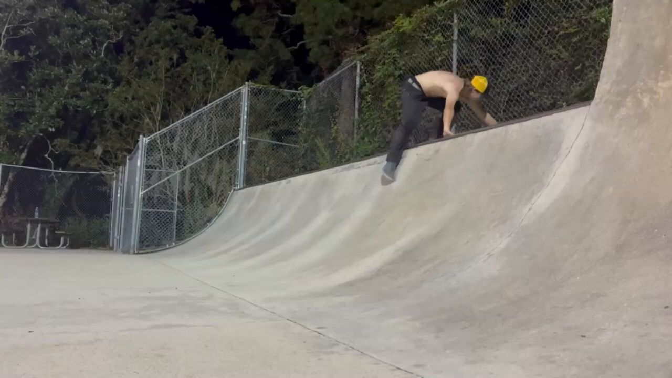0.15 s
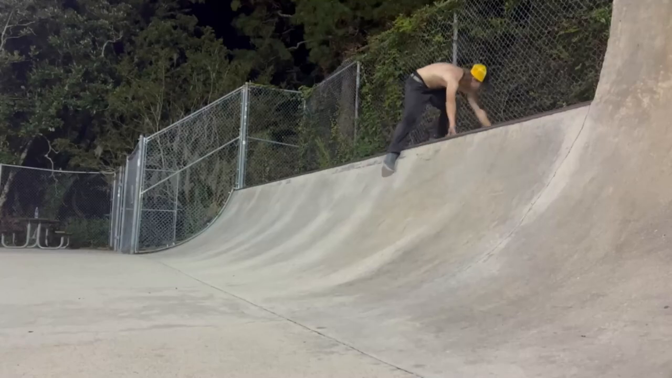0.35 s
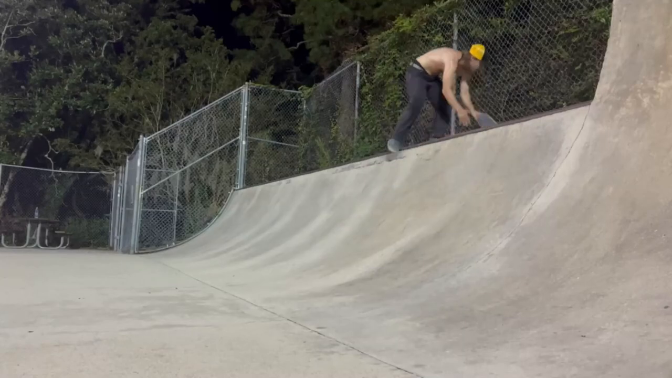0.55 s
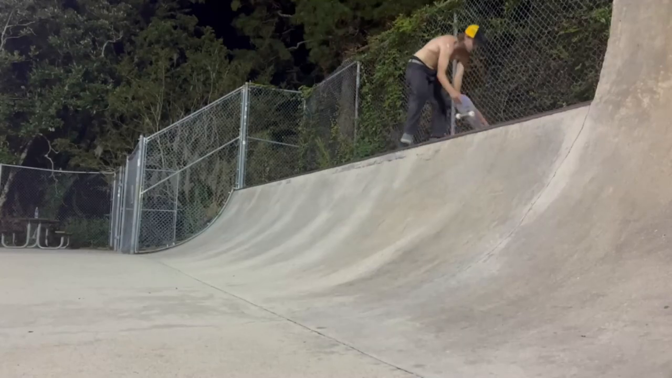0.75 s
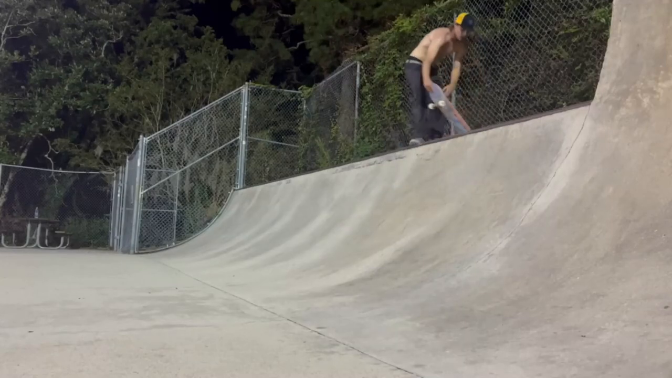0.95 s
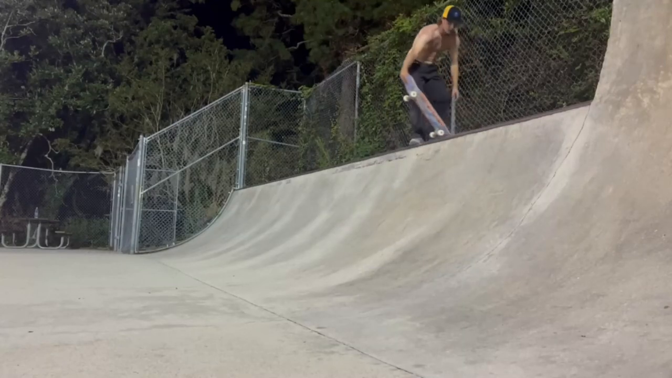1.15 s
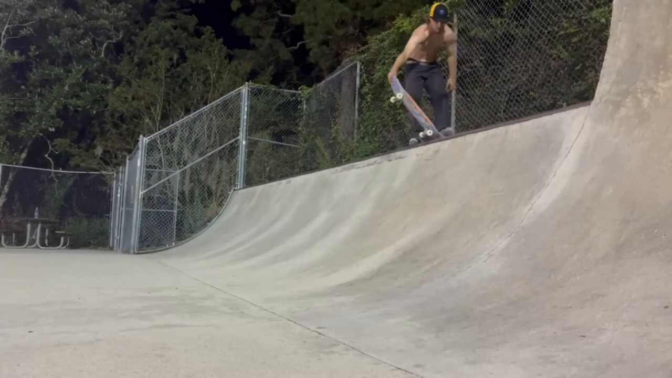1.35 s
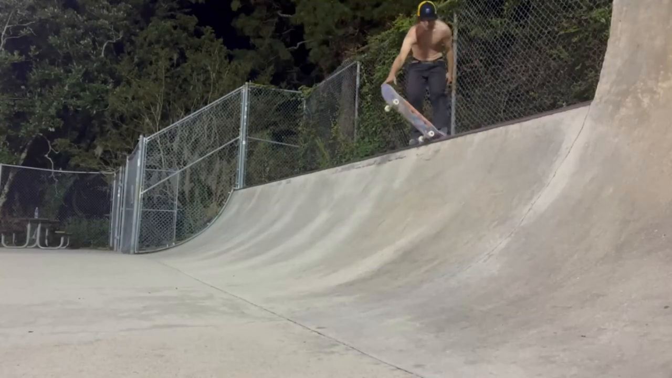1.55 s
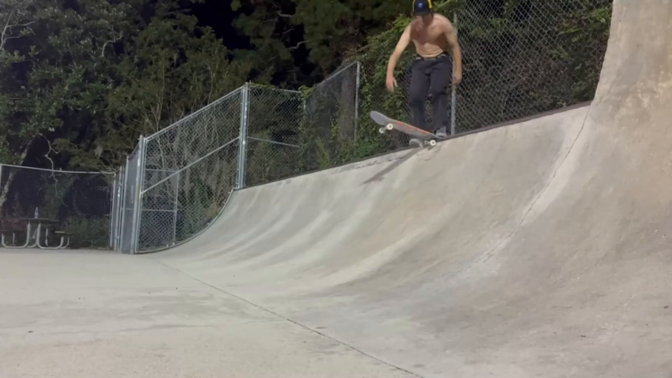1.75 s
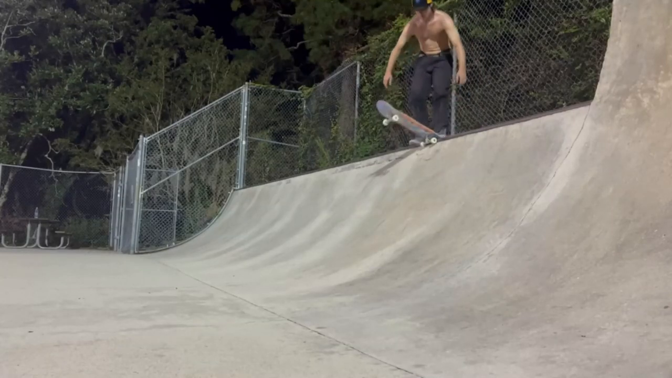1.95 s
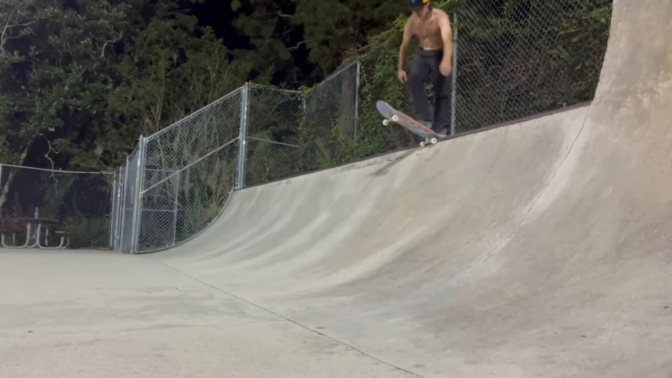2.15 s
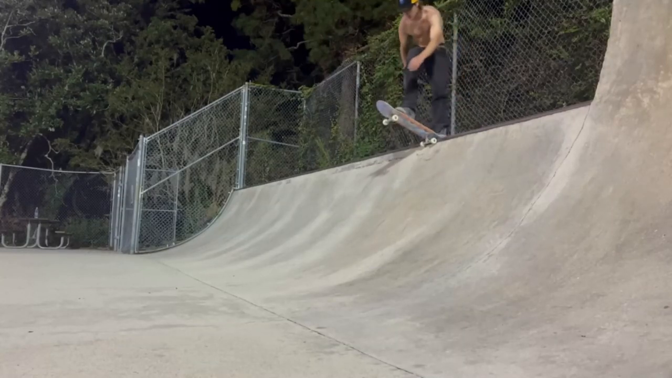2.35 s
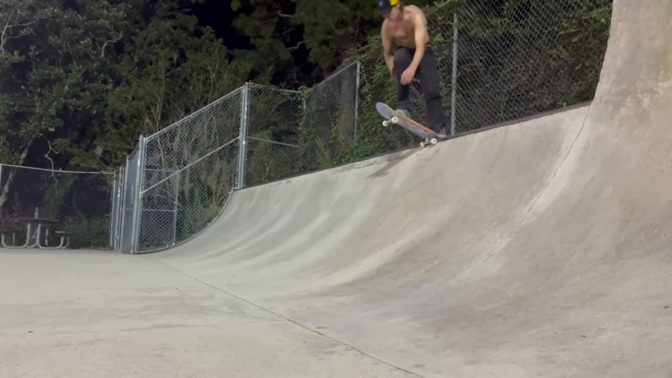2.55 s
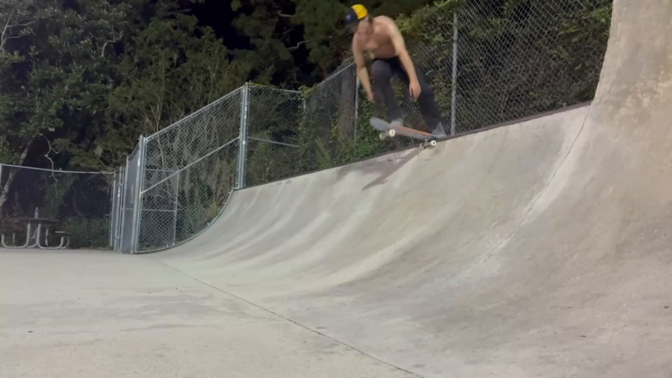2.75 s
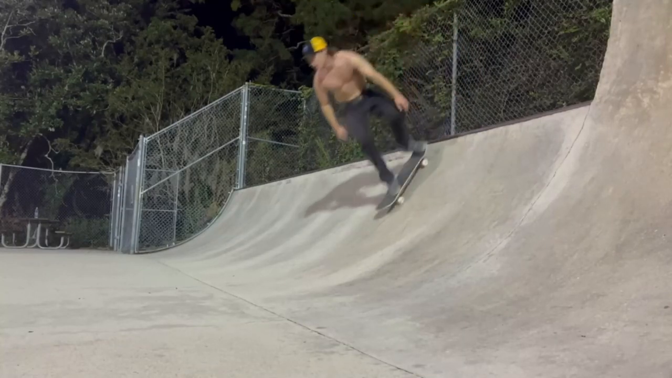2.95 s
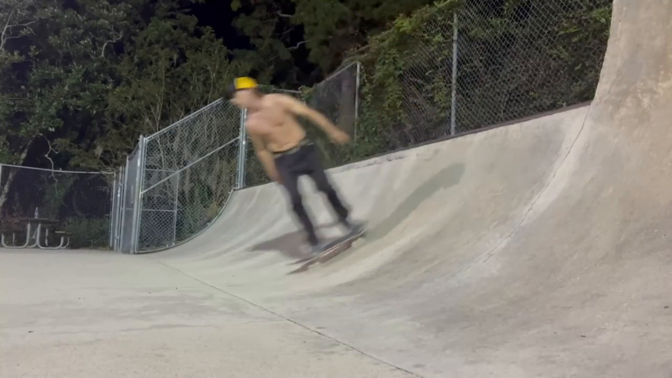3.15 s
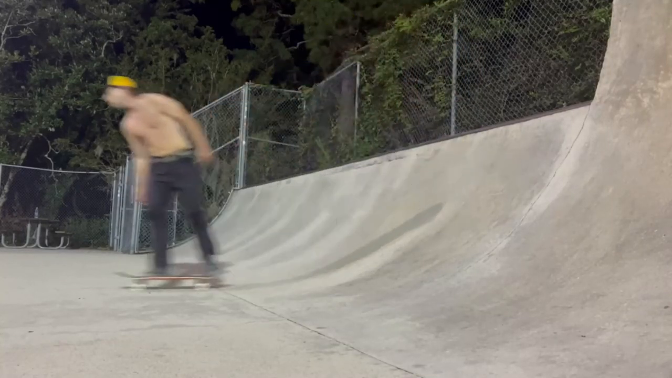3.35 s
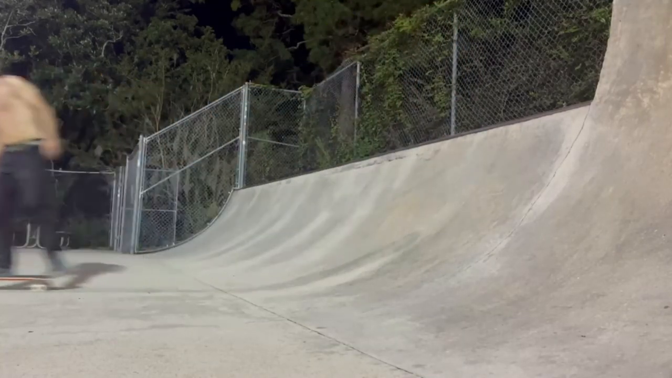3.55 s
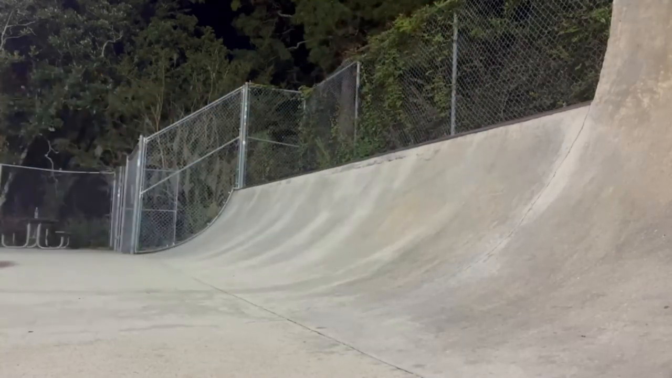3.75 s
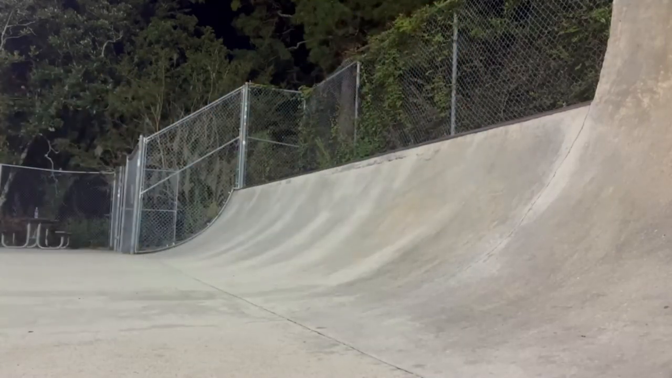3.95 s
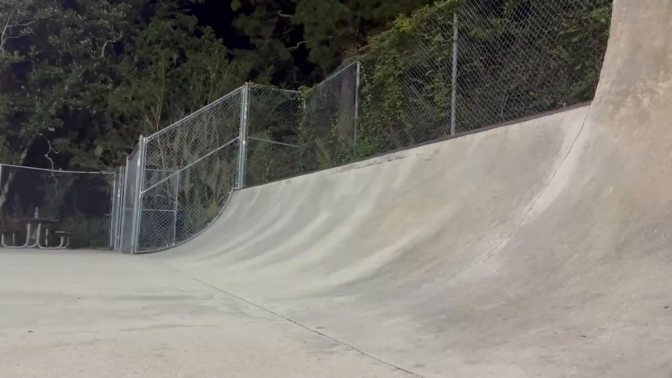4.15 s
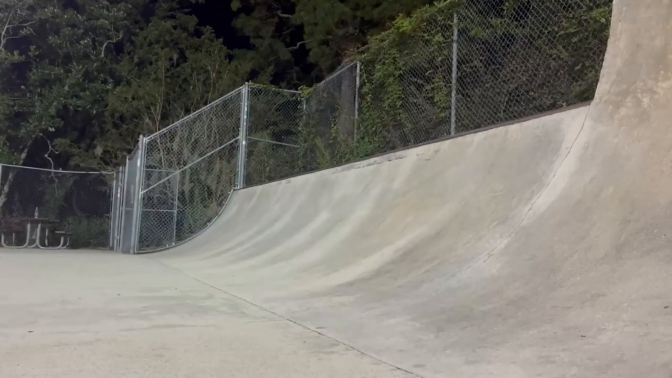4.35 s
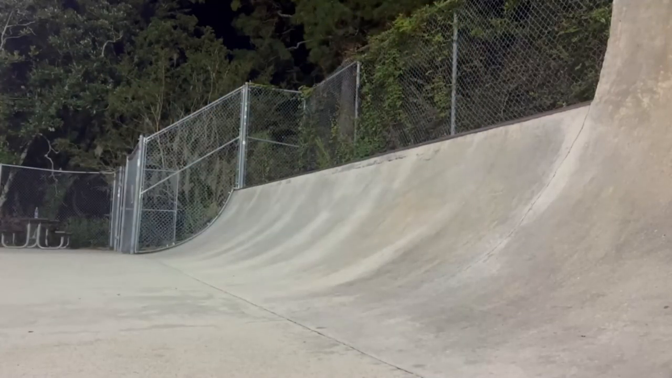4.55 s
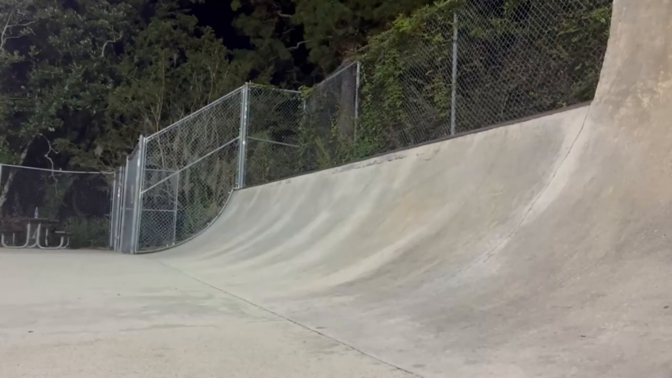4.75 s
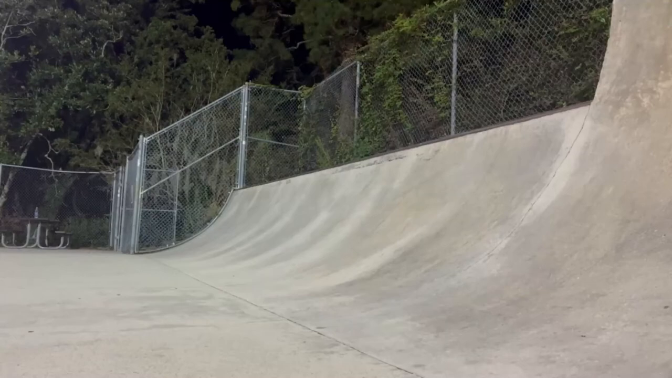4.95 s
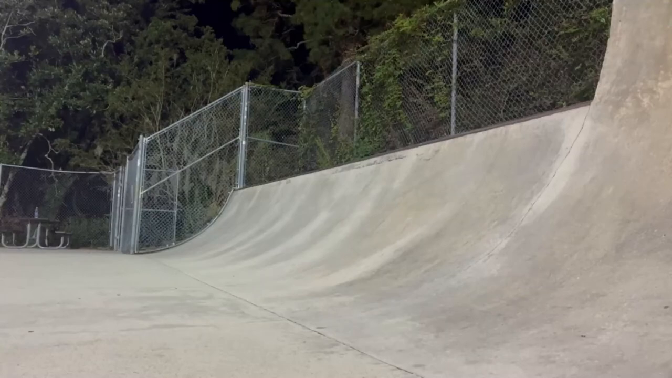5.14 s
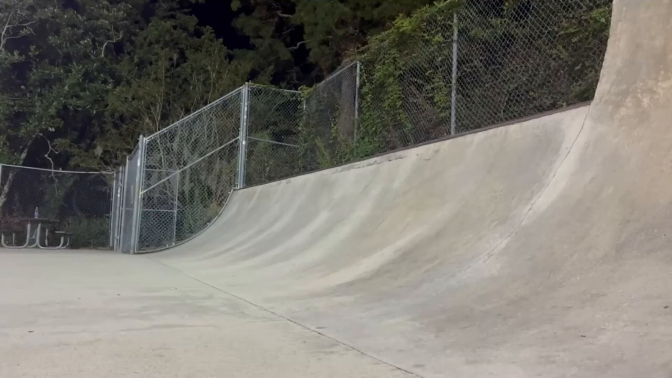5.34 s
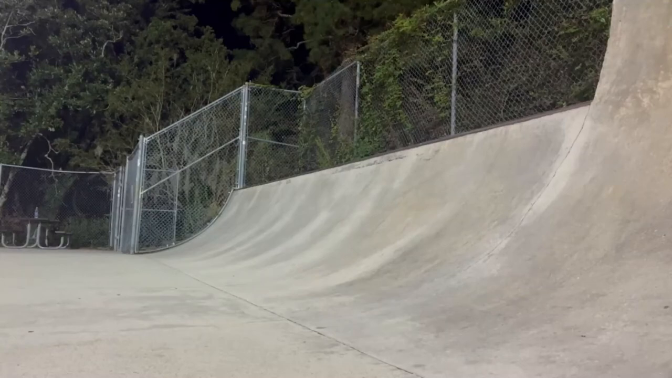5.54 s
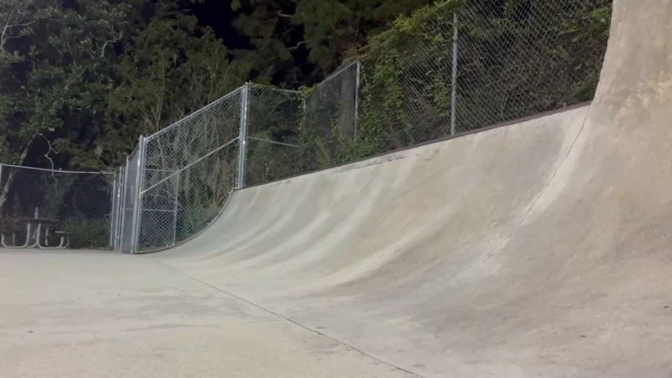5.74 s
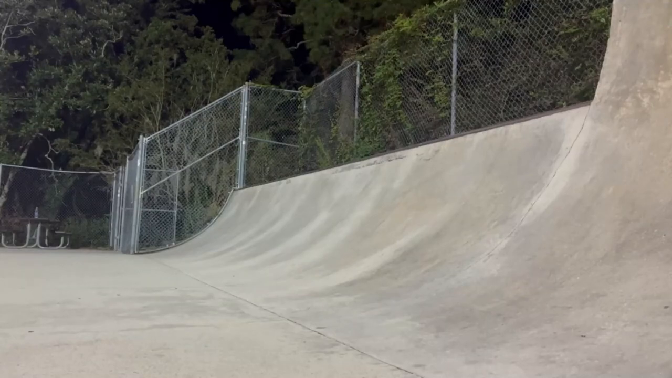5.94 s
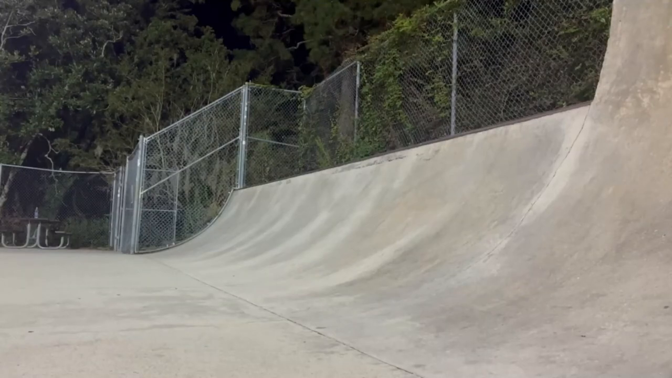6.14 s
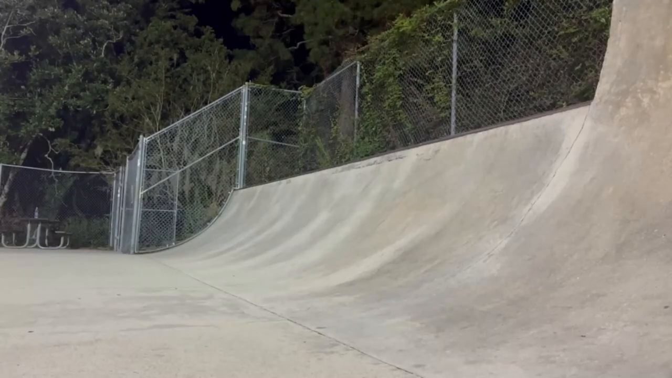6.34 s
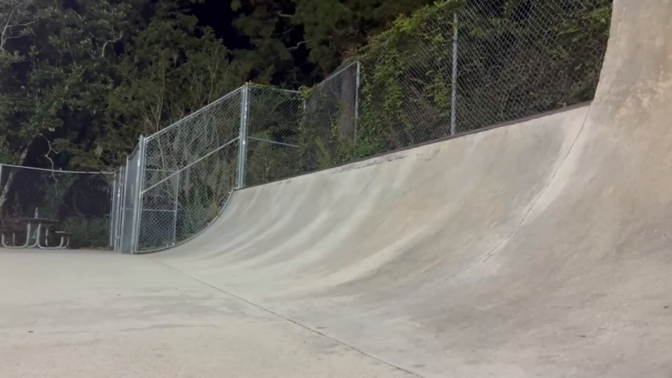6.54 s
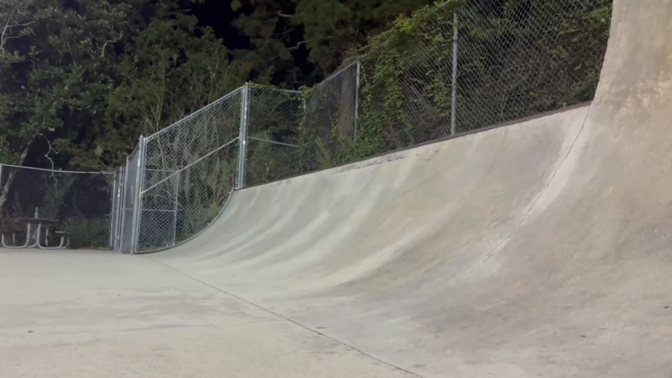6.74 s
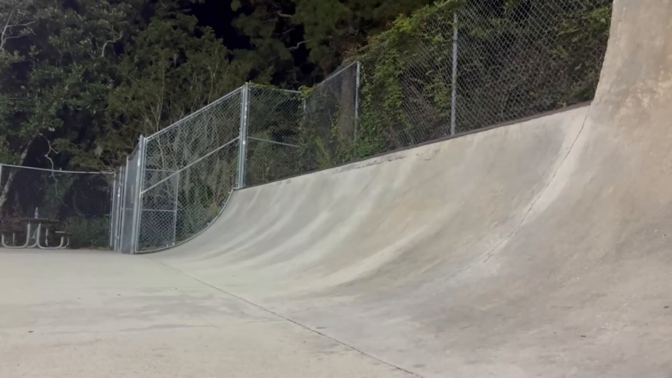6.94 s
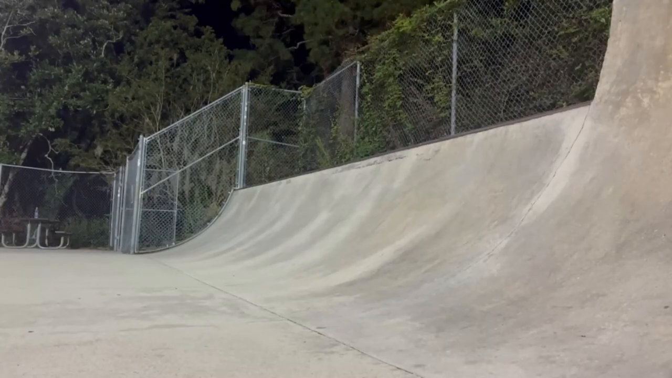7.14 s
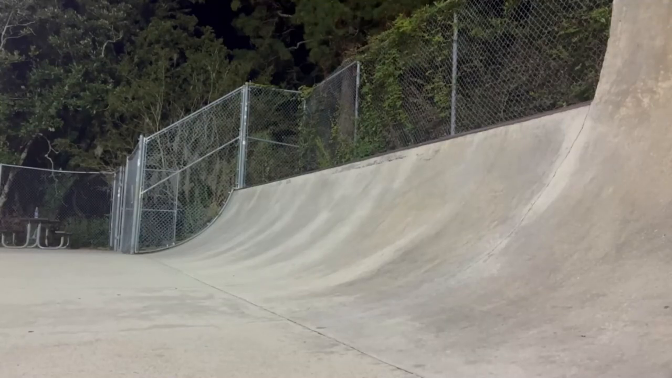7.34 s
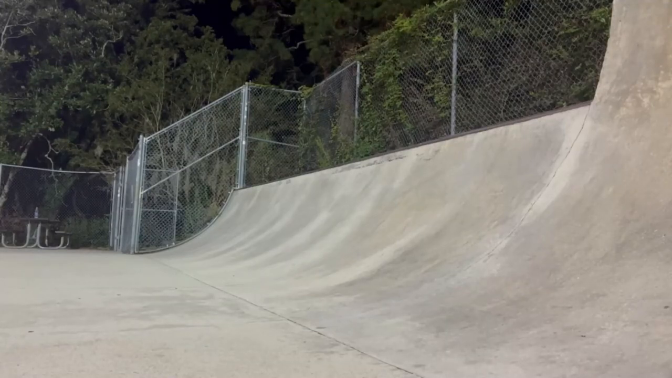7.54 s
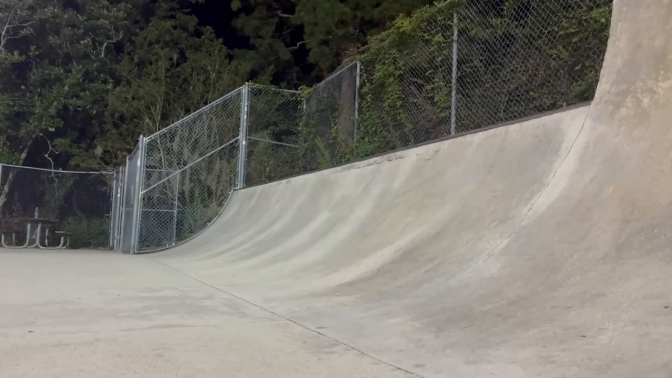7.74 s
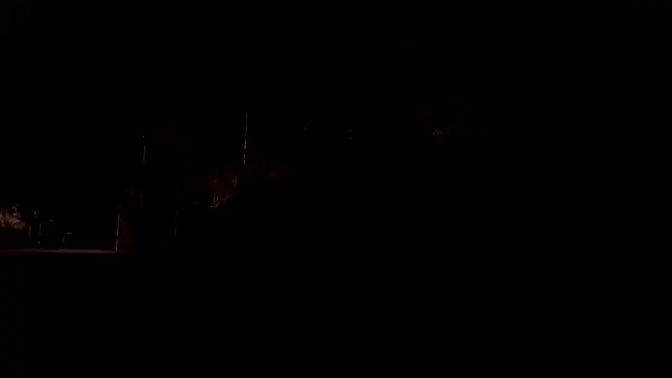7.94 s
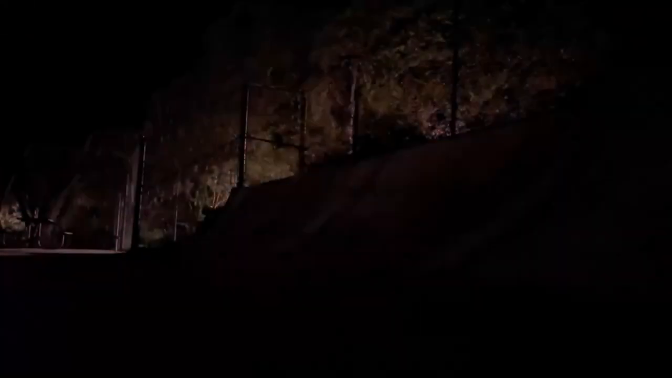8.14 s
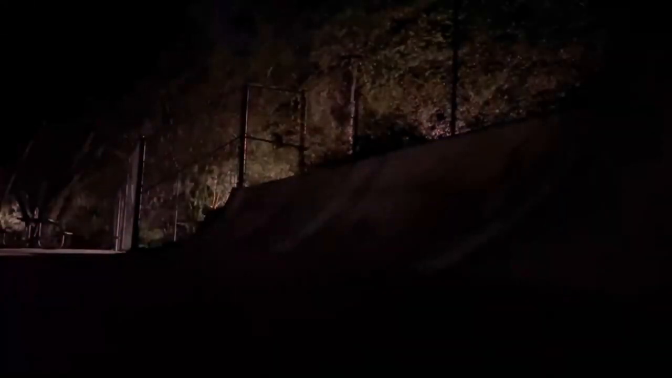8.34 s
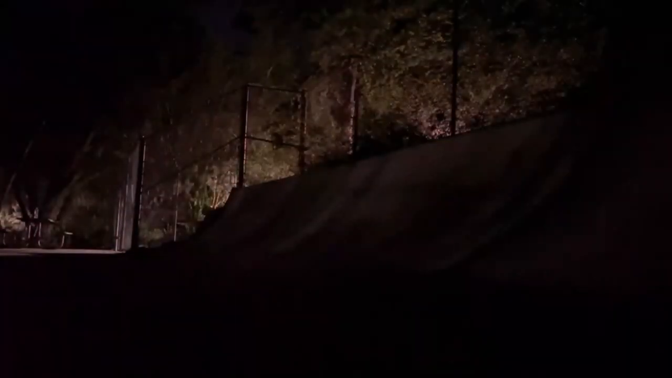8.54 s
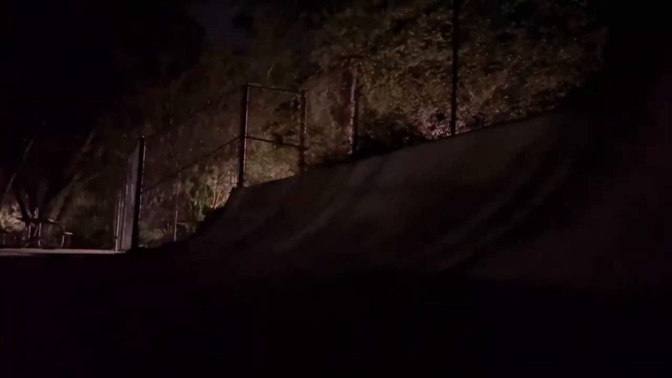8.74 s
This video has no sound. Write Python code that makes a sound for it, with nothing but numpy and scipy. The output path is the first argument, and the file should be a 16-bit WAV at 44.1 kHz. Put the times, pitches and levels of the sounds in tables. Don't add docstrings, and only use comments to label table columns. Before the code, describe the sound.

A night skatepark heard in wide stereo, with a steady insect shimmer, a soft low cricket trill, individual chirps on the left and a faint low traffic rumble throughout. Shoes scuff softly from the start; small board knocks come near 0.4 seconds and a sharper clack at 0.7. From 0.75 to 1.3 the tail scrapes over concrete in a rough stutter, the wooden deck ringing. A hard clack at 1.67, smaller knocks to 2.0, and taps with shoe scuffs around 2.4 to 2.85 follow. At 2.96 the board slaps down loudest, with brief ramp echoes. Wheels grind on the ramp until about 3.4, then rumble more smoothly leftward, strongest near 3.7 and fading by about 6. Crickets dominate, the trill weakening after 6.4. Distant scuffs begin around 6, clattering board knocks arrive at 7.2 to 7.45, and a last dull knock sounds near 7.95, leaving insects.

```python
import sys
import numpy as np
from scipy import signal
from scipy.fft import rfft, irfft, next_fast_len
from scipy.io import wavfile
from scipy.ndimage import uniform_filter1d, map_coordinates

SR = 44100
rng = np.random.default_rng(int(sys.argv[2]) if len(sys.argv) > 2 else 0)


def generate_wav(sig):
    pcm = np.round(np.clip(np.atleast_2d(sig).T, -1, 1) * 32767).astype(np.int16)
    wavfile.write(sys.argv[1], SR, pcm)


def to_linear_factor(level_db):
    exponent = np.asarray(level_db, float) / 20
    return 10 ** exponent


N = 392049


def unit(x):
    return x / np.sqrt(np.mean(x ** 2) + 1e-20)


def along(points, hz):
    f, v = np.transpose(points)
    return np.interp(np.log(hz + 1), np.log(f + 1), v, left=v[0] - 40, right=v[-1] - 40)


def curves(rows, quiet=None):
    s, *columns = np.transpose(np.vstack(rows))
    return [np.interp(np.arange(N) / SR, s, c, left=quiet, right=quiet) for c in columns]


def wobble(rate_hz):
    knots = rng.standard_normal(int(N * rate_hz / SR) + 4)
    return map_coordinates(knots, [np.arange(N) * rate_hz / SR])


def filtered(x, response):
    m = next_fast_len(N + SR // 2)
    return irfft(rfft(x, m) * response(np.fft.rfftfreq(m, 1 / SR)), m)[..., :N]


def modes(table):
    def response(f):
        total = 0
        for k, (hz, width_hz, db) in enumerate(table):
            total = total + (-1) ** k * to_linear_factor(db) * 1j * f * width_hz / (hz * hz - f * f + 1j * f * width_hz)
        return total
    return response


def gritty(spectrum, lump_db, rate_hz):
    lumpy = rng.standard_normal(N) * to_linear_factor(lump_db * wobble(rate_hz))
    return unit(filtered(lumpy, lambda hz: to_linear_factor(along(spectrum, hz))))


def spread(spectrum, alike, left_db):
    def response(hz):
        turn = np.arccos(np.clip(alike(hz), -1, 1)) / 2
        return to_linear_factor(along(spectrum, hz)) * [np.cos(turn), np.sin(turn)]
    mid, side = filtered(rng.standard_normal((2, N)), response)
    return unit(np.array([mid + side, mid - side])) * to_linear_factor([[left_db / 2], [-left_db / 2]])


# f/Hz, level/dB per Hz
CHORUS_SPECTRUM = [(2530, -46.5), (3600, -36), (4500, -27), (4820, -14), (5420, 4.5), (5870, -1), (6090, 4),
                   (6330, 6.5), (7240, -4.5), (7580, -33), (7850, -44), (7920, -50), (8200, -65),
                   (10700, -88), (18000, -120)]
# f/Hz, level/dB per Hz
TRAFFIC_SPECTRUM = [(12, -58), (20, -42), (40, -11), (69, -4.5), (128, -9.5), (194, -16), (237, -17.5),
                    (368, -24.5), (833, -29.5), (920, -33.5), (1100, -36.5), (2350, -44.5), (3060, -90),
                    (5170, -120)]
CHORUS_DB = -59
TRAFFIC_DB, TRAFFIC_SINKS_DB_PER_S = -50.5, -0.39


def night():
    chorus_db = CHORUS_DB + 1.5 + 3.6 * wobble(4.7)
    chorus = to_linear_factor(chorus_db) * spread(CHORUS_SPECTRUM, lambda hz: 0 * hz, left_db=9.5)
    traffic = spread(TRAFFIC_SPECTRUM, lambda hz: np.sinc(hz / 500), left_db=0.5)
    traffic_db = TRAFFIC_DB + 5.0 + TRAFFIC_SINKS_DB_PER_S * np.arange(N) / SR + 0.37 * wobble(9.8)
    return chorus + to_linear_factor(traffic_db) * traffic


TRILL_DB, TRILL_SWAY_DB, STROKES_PER_S = -66, -0.7, 59
TRILL_TIRES_S, TRILL_FADE_DB_PER_S = 6.4, -1.9


def trill():
    tired_s = np.maximum(np.arange(N) / SR - TRILL_TIRES_S, 0)
    db = TRILL_DB + TRILL_SWAY_DB * wobble(2.0) + TRILL_FADE_DB_PER_S * tired_s
    stroke_phase = 2 * np.pi * np.cumsum(STROKES_PER_S + 0.75 * wobble(2.6)) / SR
    strokes = (.5 - .5 * np.cos(stroke_phase)) ** 1.3
    tone = np.sin(2 * np.pi * np.cumsum(2700 + 15 * wobble(30)) / SR) * to_linear_factor(0.71 * wobble(22))
    blur_spectrum = [(2450, -17.5), (2620, 2), (2720, 2.0), (2950, -20.0)]
    blur = spread(blur_spectrum, lambda hz: 0.04 + 0 * hz, left_db=6.5)
    return to_linear_factor(db) * (unit(tone * strokes) * to_linear_factor([[.6], [-.6]]) + 1.36 * blur)


# f/Hz, level/dB
GRIT_SPECTRUM = [(600, -38), (1200, 1), (1600, -0.5), (2200, -1), (3000, -8.5), (4500, -21)]
# f/Hz, level/dB
RASP_SPECTRUM = [(1500, -4.5), (2800, -2), (3500, -5), (4500, -6.5), (6000, -2), (7500, -9.5)]
# f/Hz, level/dB
HISS_SPECTRUM = [(6000, -26), (7500, -10.5), (8300, 8.5), (9300, 1), (10200, -13.5), (10900, -34),
                 (11500, 10.5), (12000, -38)]


def treble(grit, rasp, hiss):
    coarse = grit * gritty(GRIT_SPECTRUM, lump_db=2.0, rate_hz=90)
    fine = rasp * gritty(RASP_SPECTRUM, lump_db=1.5, rate_hz=61)
    return coarse + fine + hiss * gritty(HISS_SPECTRUM, lump_db=6.0, rate_hz=8.1)


# f/Hz, level/dB
STEP_SPECTRUM = [(150, -16), (300, -4), (600, 0.5), (1100, -4), (2000, -10.5), (3500, -26.5)]
# t/s, length/s, level/dB, slide over step/dB
SHOE_SCUFFS = [(-.1, 0.16, -63.5, -2), (0.112, 0.46, -57.5, 1), (0.35, 0.46, -49.5, -7),
               (1.42, 0.28, -54, -9), (1.678, 0.082, -53, -3), (1.79, 0.18, -46.5, -8.5),
               (1.897, 0.26, -51, -12.5), (2.334, 0.17, -51, -7), (2.576, 0.31, -54, -9),
               (2.805, 0.052, -56.5, 2), (3.387, 0.03, -53, 13.5), (5.987, 0.6, -49, -11.5),
               (6.573, 0.17, -53, -31), (6.756, 0.38, -47.5, -18), (7.228, 0.47, -48, -9),
               (7.845, 0.28, -47, -35)]
SOLE_HISS_OVER_RASP_DB = -5


def shoes():
    t, step, slide = np.arange(N) / SR, 0, 0
    for s, length_s, db, slide_db in SHOE_SCUFFS:
        progress = np.clip((t - s) / length_s, 0, 1)
        swell = to_linear_factor(db) * np.abs(np.sin(np.pi * progress)) ** 1.6
        step = step + swell
        slide = slide + to_linear_factor(slide_db) * swell
    dull = step * gritty(STEP_SPECTRUM, lump_db=5.0, rate_hz=49)
    return dull + treble(0, slide, slide * to_linear_factor(SOLE_HISS_OVER_RASP_DB))


def chirps(rows):
    strokes_per_s = 63
    out, t = np.zeros(N + SR), np.arange(round(8 / strokes_per_s * SR)) / SR
    count, stroke = np.divmod(t * strokes_per_s, 1)
    for s, hz, db in rows:
        size, start = rng.normal(0, 1, (2, 9))[:, count.astype(int)]
        wing = to_linear_factor(db + 9.0 + 1.0 * size) * np.sin(np.pi * stroke)
        phase = 2 * np.pi * np.cumsum(hz + 260 * (.5 - stroke)) / SR + 2.46 * start
        out[round(s * SR):][:len(t)] += wing * np.sin(phase)
    return out[:N]


# t/s, f/Hz, level/dB
NEAR_CHIRPS = [(0.09, 5460, -61), (0.43, 5550, -46.5), (0.67, 5420, -54.5), (1.43, 5160, -56.5),
               (1.6, 5540, -50.5), (1.8, 5420, -53), (2.13, 5450, -52.5), (2.56, 5360, -57),
               (2.83, 5120, -57.5), (3.07, 5270, -54), (3.1, 5470, -54), (3.7, 5270, -50), (4.1, 5440, -56),
               (4.45, 5130, -58), (4.48, 5450, -54), (4.73, 5740, -60), (5.02, 5440, -52.5),
               (5.52, 5500, -65), (5.8, 5450, -54), (6.2, 5600, -52.5), (6.22, 5120, -58),
               (6.58, 5400, -51), (7.08, 5380, -56.5), (7.48, 5350, -60), (7.66, 5775, -59),
               (7.88, 5160, -55), (8.02, 5630, -57.5), (8.37, 5900, -62), (8.47, 5320, -55.5),
               (8.69, 5330, -49.5)]


def hedge():
    near = chirps(NEAR_CHIRPS)
    crowd = []
    for db in (-71, -76):
        crowd.append(chirps(rng.random((150, 3)) * [N / SR, 1150, 8] + [0, 5400, db]))
    direct = np.array([near, to_linear_factor(-19) * np.roll(near, 20)])
    return direct + to_linear_factor(-12.5) * park(near) + np.array(crowd)


# f/Hz, width/Hz, level/dB
DECK_MODES = [(280, 31, -1.5), (431.4, 36.7, 2.5), (590, 180, -6.5), (760, 24, -7), (1010, 160, -8.5),
              (1590, 300, -15.5), (1953, 80.3, -11), (2630, 60, -44), (3250, 78, -23), (3770, 33, -36)]
# f/Hz, width/Hz, level/dB
THUD_MODES = [(110, 130, -10), (250, 195, 2), (616, 250, 0.5)]
# f/Hz, width/Hz, level/dB
CLACK_MODES = [(900, 66, 4.5), (1402, 345, 7), (1777, 510, 3), (2140, 230, 0), (2456, 304, -9)]
# f/Hz, level/dB
CRACK_SPECTRUM = [(1500, -30), (3000, 3.5), (4500, -4.5), (7000, -11.5), (10000, -16.5), (11600, -18.5),
                  (12600, -25), (13200, -48)]
# t/s, clack level/dB, thud over clack/dB,
# crack over clack/dB, deck note f/Hz
HANDLING_BLOWS = [(0.403, -44, -6, -29, 370), (0.41, -44.5, -9.5, -31, 590), (0.493, -42.5, -14, -34, 590),
                  (0.503, -43, -9, -30, 400), (0.58, -34.5, 0, -37, 520), (0.686, -18, -9, -24.5, 470),
                  (0.692, -24, -5, -11, 1130), (0.723, -25, -13, -13, 474), (0.732, -36, -1, -25, 1180),
                  (0.759, -27, -4, -12, 1076), (0.795, -26, -15, -19, 485), (1.56, -47.5, 2.5, -1.5, 543),
                  (1.6745, -15, -12, -15, 556), (1.687, -35.5, 4, -16, 300), (1.705, -22.5, -4, -8, 256),
                  (1.789, -27, 1.5, -10.5, 412), (1.817, -24, -13.5, -9, 279),
                  (1.86, -53.5, 15.5, -25, 292), (1.972, -29.5, -0.5, -28, 226), (2.028, -46, 7.5, -5, 570),
                  (2.374, -22, -7, -16.5, 500), (2.421, -30, 0.5, -38, 538),
                  (2.661, -28.5, -10.5, -31, 583), (2.671, -31, -2.5, -15, 463),
                  (2.727, -48.5, 5, -25.5, 590), (2.845, -40, -11, -4, 264)]
# t/s, clack level/dB, thud over clack/dB, crack over clack/dB, deck note f/Hz
RIDE_BLOWS = [(2.961, -16, -14, -3.5, 760), (2.963, -11, -15, -10.5, 760), (2.967, -9, -11, -11, 615),
              (2.972, -31.5, 12, -20, 93), (3.012, -37, 6.5, -22, 587), (3.277, -33, 6, -54, 212),
              (3.352, -38, 10, -33, 200), (3.4, -31, -4, -13, 304), (3.729, -33, -3, -12.5, 347),
              (6.857, -45, -2.5, -2, 270), (7.177, -26.5, -14, -12, 330), (7.3, -17.5, -15, -9, 288),
              (7.305, -20, -1.5, -4.5, 610), (7.312, -20.5, -15, -21.5, 400), (7.351, -34, -11, -24, 430),
              (7.404, -25, -6, -21, 900), (7.411, -31, -15, -22, 900), (7.415, -21, -8.5, -12, 418),
              (7.46, -46, -14, -46, 710), (7.955, -28.5, 7.5, -26, 556), (7.963, -34, 2, -15, 250)]
BLOW_RISE_S, BLOW_HOLD_S, BLOW_T60_S = .004, 0.0012, 0.063
FIRST_TOUCH = 6.8
DECK_RING_DB = 11


def blows():
    t = np.arange(SR // 5) / SR
    bands = np.zeros((4, N + SR))
    t60_s = BLOW_T60_S * np.array([[.7], [.42], [.4], [1.15]])
    rise = np.clip(t / BLOW_RISE_S, 0, 1) ** 1.6
    shape = rise * to_linear_factor(-60 * np.maximum(t - BLOW_RISE_S - BLOW_HOLD_S, 0) / t60_s)
    for s, db, thud_db, crack_db, hz in HANDLING_BLOWS + RIDE_BLOWS:
        rattle = np.tile(rng.standard_normal(len(t)), (3, 1))
        rattle[:, round(BLOW_RISE_S * SR)] = -FIRST_TOUCH
        shake = np.vstack([rattle, np.sin(2 * np.pi * hz * t)])
        level = to_linear_factor(db + np.array([[thud_db], [0], [crack_db], [thud_db]]))
        bands[:, round((s - .003) * SR):][:, :len(t)] += level * shape * shake
    thud, clack, crack, note = bands[:, :N]
    body = to_linear_factor(12.5) * filtered(thud, modes(THUD_MODES)) + to_linear_factor(-1.5) * note
    deck = to_linear_factor(DECK_RING_DB) * filtered(thud, modes(DECK_MODES))
    metal = to_linear_factor(2.5) * filtered(clack, modes(CLACK_MODES))
    return body + deck + metal + to_linear_factor(4.5) * filtered(crack, lambda hz: to_linear_factor(along(CRACK_SPECTRUM, hz)))


# t/s, level/dB, f/Hz, t60/s
BOARD_NOTES = [(0.405, -44, 1210, 0.044), (0.495, -41, 990, 0.037), (0.724, -23.5, 462, 0.086),
               (0.76, -28, 477, 0.1), (0.797, -33, 1110, 0.045), (1.044, -14, 446, 0.11),
               (1.063, -17.5, 424, 0.11), (1.102, -21, 1985, 0.044), (1.106, -30, 3310, 0.044),
               (1.209, -29, 1170, .04), (1.255, -36, 445, .2), (1.673, -19, 1210, 0.021),
               (1.674, -21, 2190, 0.03), (1.674, -15, 570, 0.023), (1.817, -18.5, 2160, 0.019),
               (2.9619, -5.5, 365, 0.037), (2.9635, -5.5, 727, 0.035), (2.966, -7, 2420, 0.015),
               (2.974, -15.5, 400, 0.071), (2.374, -25, 1500, .015), (2.727, -43, 704, .04),
               (7.3, -25, 2120, 0.053), (7.3, -22, 1604, 0.047), (7.303, -14, 687, 0.038),
               (7.308, -16, 290, 0.024), (7.35, -35.5, 2430, .05), (7.407, -24, 1514, .06),
               (7.411, -28, 2297, .06), (7.406, -19, 958, 0.093), (7.408, -30, 440, 0.087),
               (7.953, -20.5, 520, 0.052), (7.955, -27, 700, 0.031), (7.961, -26.5, 244, 0.041),
               (7.955, -44, 1870, 0.028), (7.99, -31, 535, 0.045), (8.003, -33, 568, 0.095)]
NOTE_RISE_S = 0.0019


def notes():
    out, t = np.zeros(N + SR), np.arange(SR // 4) / SR
    rise = 1 - np.exp(-t / NOTE_RISE_S)
    for s, db, hz, t60_s in BOARD_NOTES:
        out[round(s * SR):][:len(t)] += to_linear_factor(db - 60 * t / t60_s) * rise * np.sin(2 * np.pi * hz * t)
    return out[:N]


# t/s, level/dB
DRAG_PRESSURE = [(0.7, -47), (0.8, -30.5), (0.85, -31.5), (0.93, -30), (1.0, -28), (1.06, -27), (1.15, -29),
                 (1.28, -45.5), (1.36, -71)]
# t/s, level over steady pressure/dB
TAIL_HOPS = [(0.838, -7), (0.88, 1.5), (0.899, 4.5), (0.921, 2), (0.949, 4.5), (0.974, 4), (0.992, -5),
             (1.013, 4), (1.035, 3), (1.049, 4), (1.072, 1.5), (1.1, 7), (1.133, 1), (1.178, 4),
             (1.203, 10), (1.266, 5)]
DRAG_SCRAPE_DB = [-10, -19.5, -20.5]
HOP_RISE_S, HOP_FALL_S, STEADY_GRIP = 0.0033, 0.011, .6
DRAG_TOP_HZ = 10780


def drag():
    deck_db, = curves(DRAG_PRESSURE, -120)
    t, grip = np.arange(N) / SR, STEADY_GRIP
    for s, db in TAIL_HOPS:
        since_peak_s = t - s - HOP_RISE_S
        ease_s = np.where(t < s + HOP_RISE_S, HOP_RISE_S / 2, HOP_FALL_S)
        grip = grip + (to_linear_factor(db) - STEADY_GRIP) * np.exp(-np.abs(since_peak_s) / ease_s)
    jumps = unit(rng.standard_normal(N) * to_linear_factor(0.86 * wobble(60) + 2.9 * wobble(300)))
    stutter = jumps * grip * to_linear_factor(deck_db - 1.0)
    impulse = 1. * (np.arange(N) == 0)
    deck = modes(DECK_MODES)
    ring = filtered(stutter, deck) / np.linalg.norm(filtered(impulse, deck))
    scratch = to_linear_factor(deck_db - 2.0) * grip ** 0.17 * treble(*to_linear_factor(DRAG_SCRAPE_DB))
    return filtered(ring + scratch, lambda hz: 1 / (1 + (hz / DRAG_TOP_HZ) ** 30))


def patchy(x, patchy_db):
    z = signal.stft(x, nperseg=1024)[2]
    field = uniform_filter1d(rng.standard_normal(z.shape), size=7, axis=0)
    field = uniform_filter1d(field, size=4, axis=1)
    return unit(signal.istft(z * to_linear_factor(patchy_db * unit(field)), nperseg=1024)[1][:N])


# t/s, level/dB
ROLL_LEVEL = [(2.99, -64), (3.06, -36.5), (3.25, -34), (3.4, -31.5), (3.5, -32), (3.7, -29), (4.15, -31),
              (4.4, -33), (4.75, -36), (5.1, -35.5), (5.55, -34), (5.85, -39), (6.1, -46), (6.6, -51.5),
              (7.3, -46.5)]
# f/Hz, level/dB
WHEEL_SPECTRUM = [(70, -23.5), (130, -5.5), (200, -12), (310, -2), (450, -3), (650, -5.5), (950, -4.5),
                  (1200, -13), (1500, -24), (2500, -67)]
ROLL_SCRAPE_DB = [-16.5, -14.5, -14.5]
RAMP_END_S, RAMP_EASE_S = 3.41, 0.082
RAMP_GRIT_DB, RAMP_RASP_DB, RAMP_HISS_DB = 11, 3.5, -5.5


def roll():
    rumble_db, = curves(ROLL_LEVEL, -120)
    grit, rasp, hiss = to_linear_factor(ROLL_SCRAPE_DB)
    on_ramp = .5 - .5 * np.tanh((np.arange(N) / SR - RAMP_END_S) / RAMP_EASE_S)
    level = to_linear_factor(rumble_db - 5.5 + 0.29 * wobble(4.02))
    rumble = patchy(gritty(WHEEL_SPECTRUM, lump_db=0.25, rate_hz=47), patchy_db=2.5)
    scrape = treble(grit * to_linear_factor(RAMP_GRIT_DB * on_ramp),
                    rasp * to_linear_factor(RAMP_RASP_DB * on_ramp),
                    hiss * to_linear_factor(RAMP_HISS_DB * on_ramp))
    return level * (rumble + scrape)


# t/s, right microphone lag/samples, level left over right/dB
BOARD_PLACE = [(0, 2.9, -9), (1.1, -0.5, -5.5), (1.6, 2.5, -5), (2.4, 0.3, -5), (2.95, 2, -4.5),
               (3.08, 0.5, 2), (3.25, 4.5, -1.5), (3.37, 6, 0), (3.48, 9.5, 3), (3.65, 11, 4.5),
               (3.9, 17.5, 6), (4.3, 19.5, 3.5), (5.5, 19.5, 4), (7, 19, 3)]
BEARING_WEAVE, BASS_WEAVE = 0.037, 0.14
AIR_DB_PER_SAMPLE = -.5


def placed(x):
    late, left_db = curves(BOARD_PLACE)
    late = late * (1 + BEARING_WEAVE * wobble(4.3))

    def lowpasses(hz):
        return np.array([1 / (1 + (hz / edge_hz) ** 6) for edge_hz in (970, 2200, 6540)])
    bass, low, all_but_top = filtered(x, lowpasses)
    top = (x - all_but_top) * to_linear_factor(AIR_DB_PER_SAMPLE * np.maximum(late, 0))
    high = all_but_top - low + top
    sway = 1 + BASS_WEAVE * wobble(6.3)
    out, side = 0, np.array([[.5], [-.5]])
    paths = ((bass, 1.39 * sway, 1.2), (low - bass, 0.94 * sway, -2.2), (high, 1.0, -1.2))
    for part, detour, shade_db in paths:
        times = np.arange(N) + side * late * detour
        shifted = np.array([map_coordinates(part, [n], order=2) for n in times])
        out = out + shifted * to_linear_factor(side * (left_db + shade_db))
    return out


# f/Hz, left lead/rad, level left over right/dB
BODY_PATH = [(150, 1, -2), (400, -0.7, 7), (795, 0.5, 1), (1490, -1.47, 2.5), (2420, -0.82, 0),
             (4230, -0.15, 3), (8200, -2.9, -3), (11900, -2.8, -6.5)]
PASSES_S, PASS_EASE_S = 3.25, 0.13


def round_body(pair):
    f, turn, db = np.transpose(BODY_PATH)
    side = np.array([[.5], [-.5]])

    def bend(hz):
        lead = np.interp(np.log(hz + 1), np.log(f), turn)
        shade_db = np.interp(np.log(hz + 1), np.log(f), db)
        return np.exp(1j * side * lead) * to_linear_factor(side * shade_db)
    gone = .5 + .5 * np.tanh((np.arange(N) / SR - PASSES_S) / PASS_EASE_S)
    return gone * pair + (1 - gone) * filtered(pair, bend)


# f/Hz, t60/s
PARK_DECAY = [(200, 0.48), (1000, 0.343), (4000, 0.52), (10000, 0.25)]


def park(x):
    hz, t, z = signal.stft(rng.standard_normal((2, SR // 2)), SR, nperseg=256)
    f, t60_s = np.transpose(PARK_DECAY)
    decay = to_linear_factor(-60 * t / np.interp(hz, f, t60_s)[:, None])
    tail = signal.istft(z * decay, SR, nperseg=256)[1]
    delayed = np.pad(x, (500, 0))[None]
    return signal.fftconvolve(delayed, tail / np.linalg.norm(tail[0]), axes=1)[:, :N]


def scene():
    rolling = drag() + roll() + shoes()
    hits = blows() + notes()
    direct = round_body(placed(rolling + hits))
    echoes = park(to_linear_factor(-10.0) * rolling + to_linear_factor(-17.0) * hits)
    return direct + echoes + trill() + hedge() + night()


def roll_off(x):
    return signal.sosfilt(signal.butter(12, 12280, fs=SR, output="sos"), x)


# f/Hz, level/dB
SELF_NOISE_SPECTRUM = [(8500, -39), (10300, -17), (11000, 11), (12000, 12), (12300, -40)]


def record(dry):
    noisy = dry + to_linear_factor(-83.0) * spread(SELF_NOISE_SPECTRUM, lambda hz: -.3 + 0 * hz, left_db=-0.5)
    mix = noisy / (1 + np.abs(noisy / .95) ** 4) ** .25
    return roll_off(mix)


dry = scene()
out = record(dry)
generate_wav(out)
```